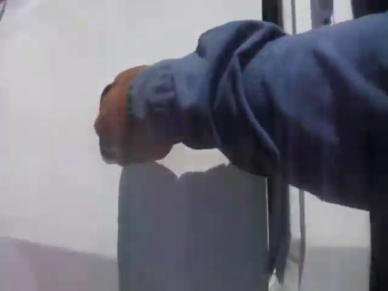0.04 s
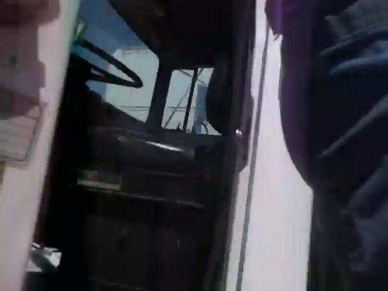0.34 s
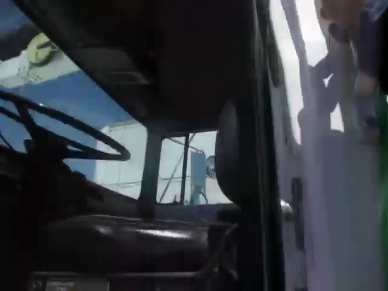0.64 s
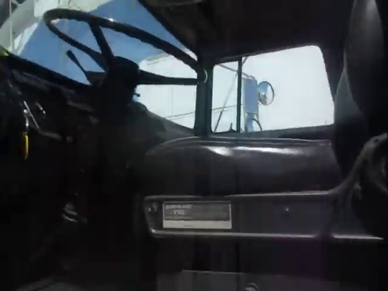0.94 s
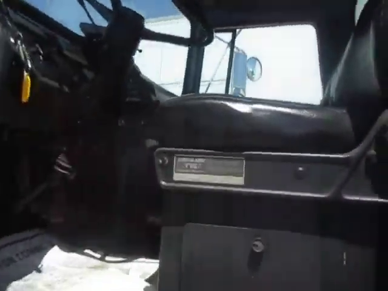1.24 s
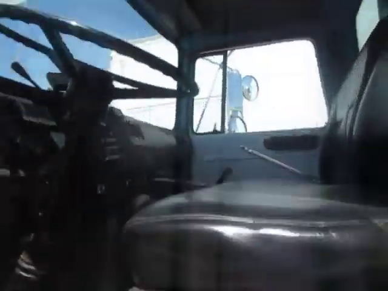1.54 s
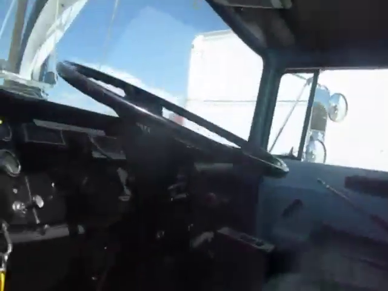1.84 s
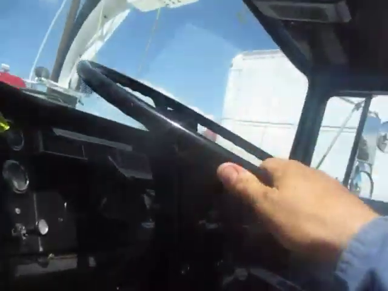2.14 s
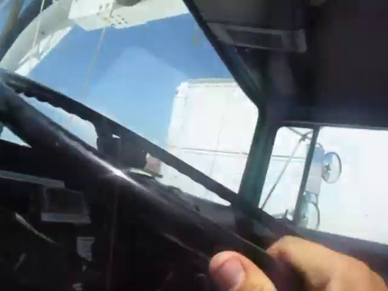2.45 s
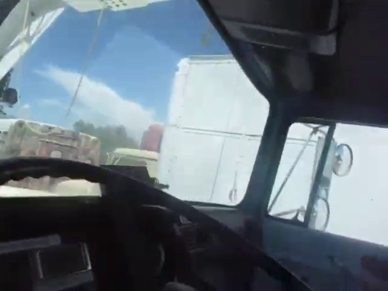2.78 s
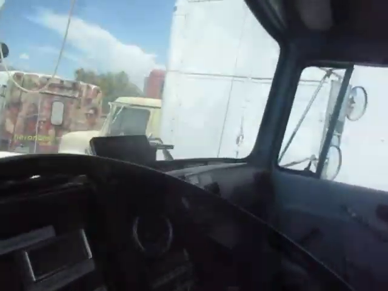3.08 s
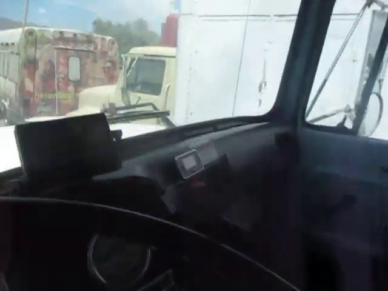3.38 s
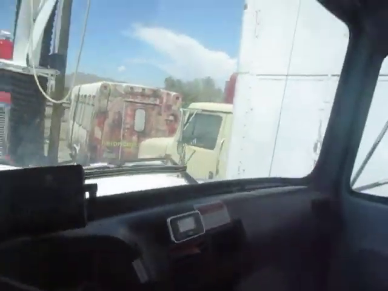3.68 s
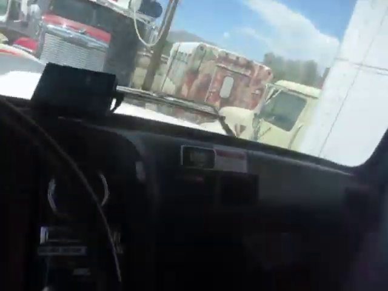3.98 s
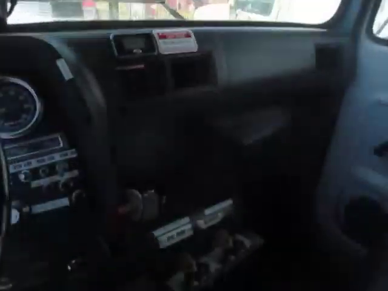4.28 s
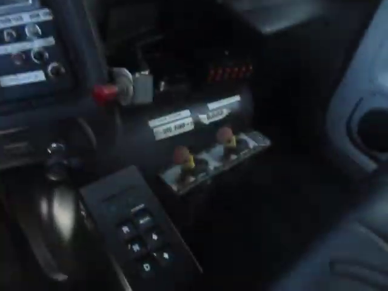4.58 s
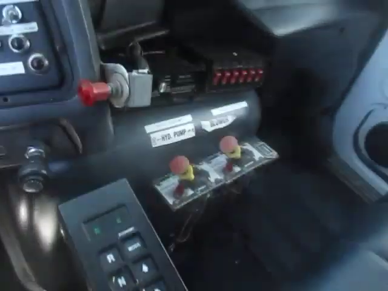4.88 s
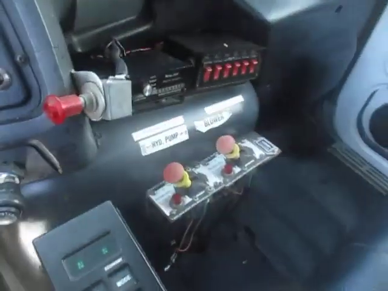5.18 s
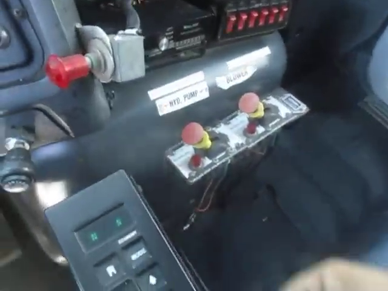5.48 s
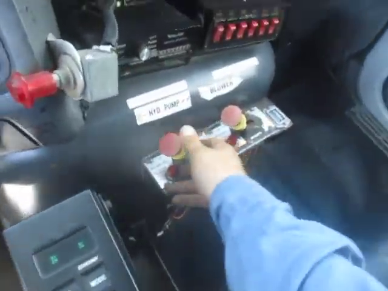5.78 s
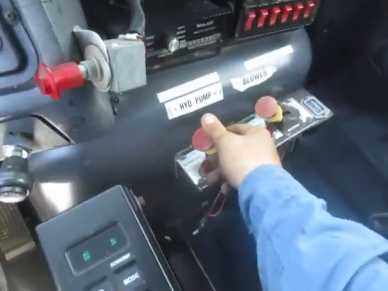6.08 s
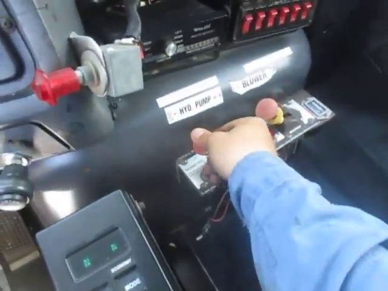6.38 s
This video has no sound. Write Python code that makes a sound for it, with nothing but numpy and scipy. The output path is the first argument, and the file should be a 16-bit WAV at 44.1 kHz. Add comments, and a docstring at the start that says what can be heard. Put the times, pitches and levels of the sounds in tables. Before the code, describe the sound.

A diesel truck idles with a steady, throbbing rumble and clatter. Close by, the door latch snaps open with a metallic rattle, feet thump on the step, and the door and seat squeak sharply in two bouts while clothes scuff. The microphone moves into the cab with the driver, where the clatter softens and the engine becomes a deeper boom. A few dull handling knocks come near the end.

```python
"""At the door of an idling six-cylinder diesel truck, the microphone going in with the driver.
Close by, the latch snaps, hinge and sprung seat squeak by stick and slip, feet thump on the step,
and clothes scuff over the upholstery. Each firing pulses the exhaust and shakes the panels.
Inside, the clatter drops back and the cab booms at the firing rate; handling knocks come near the end."""
import sys
import numpy as np
from scipy import signal
from scipy.io import wavfile
from scipy.ndimage import uniform_filter1d

SR = 44100
rng = np.random.default_rng(int(sys.argv[2]) if len(sys.argv) > 2 else 0)


def int16_out(signal):
    """Quantize to a 16-bit WAV file."""
    q = np.round(np.clip(np.atleast_2d(signal).T, -1, 1) * 32767)
    wavfile.write(sys.argv[1], SR, q.astype(np.int16))


N = 283563
T = np.arange(N) / SR


def engine(firings_per_s=43.15, hunt=0.0031):
    """The diesel, heard from door handle to dashboard; the governor lets the idle wander a little."""
    # Each row: time in seconds, then levels in dB of firing tone, its octave, rumble and clatter.
    way_in = [(0, -30, -25.5, -25, -27.5), (.5, -23, -22.5, -19.5, -24.5), (.9, -20.5, -23, -21.5, -25),
              (1.35, -19.5, -20, -20.5, -23), (2.2, -14, -16.5, -20, -26), (2.55, -16, -22, -22, -27),
              (3.0, -17.5, -22, -19, -28), (3.45, -12.5, -23.5, -19.5, -28.5),
              (4.0, -10.5, -26, -20.5, -27), (4.8, -10.5, -24.5, -21.5, -28),
              (6.43, -11.5, -26.5, -20.5, -28)]
    # Each row: time in seconds, the microphone's shielding by the cab and lean to the dashboard, both 0-1.
    mic_path = [(0, 0.11, 0.3), (2.25, 0.08, 0.3), (2.45, 0.42, 0.02), (3.4, 0.82, 0.07), (4.2, 0.91, 0.04),
                (4.8, 0.99, 1), (6.43, 0.95, 0.87)]
    firings = np.cumsum(firings_per_s * (1 + hunt * drift(2.22))) / SR
    boom_db, octave_db, rumble_db, clatter_db = in_time(way_in)
    inside, lean = np.clip(in_time(mic_path), 0, 1)
    rumble = from_db(rumble_db - 1.6) * panel_rumble(firings, inside, lean)
    clatter = from_db(clatter_db + 1.46) * diesel_clatter(firings, inside)
    pulses = exhaust(firings, boom_db, octave_db, rumble_db)
    return pulses + rumble + clatter + gear_whine(clatter_db, inside)


def exhaust(firings, boom_db, octave_db, rumble_db, waver=0.64):
    """Each firing builds pressure and drops sharply; the higher orders waver as the panels shake."""
    # Each row: multiple of the firing rate, dB added to rumble_db. Unequal cylinders give the half orders.
    orders = [(1.5, -25), (2.5, -18.5), (3, -18), (3.5, -18.5), (4, -14.5), (4.5, -25.5), (5, -27),
              (6, -18), (7, -35), (8, -21), (9, -23), (10, -21.5)]
    angle = 2 * np.pi * firings
    out = from_db(boom_db) * np.sin(angle) * (1 + 0.038 * drift(4.5))
    out += from_db(octave_db) * np.sin(2 * angle) * (1 + 0.17 * drift(8.7))
    for multiple, db in orders:
        tone = np.sin(multiple * angle + waver * drift(0.8))
        out += from_db(rumble_db + db) * tone * (1 + waver * drift(5.1))
    return -np.sqrt(2) * out


def knocks(firings, decay, floor, uneven_db):
    """An envelope that jumps at each firing and fades over its turn; cylinders and cycles differ."""
    # Each cylinder's knock in dB, in firing order.
    cylinders = [-2, 3, -3, 2.5, -1.5, 2]
    turn = firings.astype(int)
    db = np.array(cylinders)[turn % len(cylinders)] + uneven_db * rng.standard_normal(size=400)[turn]
    pulses = from_db(db) * np.exp(-(firings % 1) / decay)
    return rms_one(uniform_filter1d(floor + pulses, size=60))


def panel_rumble(firings, inside, lean):
    """The firings shake the panels into a low rumble, joined inside by the boom of the cab."""
    # In the open, then in the cab. Each row: frequency in Hz, noise density in dB.
    open_colour = [(30, -24), (60, -2), (110, -2), (180, -2.5), (260, -4.5), (400, -7.5), (560, -14.5)]
    cab_colour = [(30, 14), (60, 3.5), (110, -4.5), (180, -5.5), (320, -12.5), (420, -6.5), (560, -11.5)]
    shake = knocks(firings, decay=.4, floor=.7, uneven_db=2.8)
    noise = np.sqrt(1 - inside) * coloured(open_colour)
    noise += np.sqrt(inside) * from_db(-4) * coloured(cab_colour)
    rumble = signal.sosfilt(signal.butter(2, 700, fs=SR, output="sos"), noise * shake)
    return rumble + np.sqrt(inside) * cab_boom(shake, lean)


def cab_boom(shake, lean):
    """The panels drive standing waves in the cab; the microphone moves through their nodes."""
    # Each row: frequency and width in Hz, level in dB over the seat, level in dB by the dashboard.
    air_modes = [(133.4, 15.6, -2, -6), (175.3, 15.6, -11.5, -10), (225.7, 10.3, -16.5, -7),
                 (252.7, 70, -23, -2.5)]
    out = np.zeros(N)
    for hz, width, seat_db, dash_db in air_modes:
        b, a = signal.iirpeak(hz, hz / width, fs=SR)
        drive = shake * rng.standard_normal(N)
        wave = rms_one(signal.lfilter(b, a, signal.lfilter(b, a, drive)))
        out += from_db(seat_db + lean * (dash_db - seat_db)) * wave
    return out


def diesel_clatter(firings, inside, knock_top_hz=2200):
    """The middle range throbs with the firings; the fan's hiss above it stays more even."""
    # In the open, then in the cab. Each row: frequency in Hz, noise density in dB.
    open_colour = [(300, -10), (480, -1.5), (750, 1.5), (1200, 0), (1700, -5.5), (2500, -11), (4000, -23),
                   (6300, -30), (10000, -43), (15500, -55)]
    cab_colour = [(300, 7.5), (480, -2.5), (750, 1), (1200, -1.5), (1700, -6.5), (2500, -11), (4000, -19.5),
                  (6300, -27), (10000, -37), (15500, -50)]
    noise = np.sqrt(1 - inside) * coloured(open_colour) + np.sqrt(inside) * coloured(cab_colour)
    throb = knocks(firings, decay=1.0, floor=6.1, uneven_db=6.0) - 1
    return noise + signal.lfilter(*signal.butter(1, knock_top_hz, fs=SR), noise * throb)


def gear_whine(clatter_db, inside, pitch_hz=886, open_db=-6.5, cab_db=-11):
    """An unsteady gear tone that follows the clatter and swells at a few places on the way in."""
    # Each row: time in seconds, gain in dB, half width in seconds.
    swells = [(.81, 7.5, 0.12), (2.25, 13.5, 0.14), (3.5, 11, 0.3)]
    db = clatter_db + open_db + inside * (cab_db - open_db) + 1.6 * drift(1.4)
    db += sum(gain_db * np.exp(-((T - s) / width) ** 2) for s, gain_db, width in swells)
    hz = pitch_hz * (1 + 0.01054 * drift(31.8))
    return from_db(db) * np.sin(2 * np.pi * np.cumsum(hz) / SR) * (1 + 0.42 * drift(12.5))


def latch():
    """At arm's length the catch snaps free, rings the door shell and sets linkage and panel rattling."""
    # Each row: time of a metal strike in seconds, level in dB.
    strikes = [(0.1744, -15.5), (.179, -11), (.186, -24), (0.217, -17.5)]
    # Each row: frequency in Hz, level in dB, seconds to fall 60 dB.
    shell_modes = [(452.5, 1.5, 0.22), (514, -1, 0.36), (754, -6, 0.29), (1306, 5, 0.14), (1550, -8, .25),
                   (2700, -17, .25), (4170, -11, .09), (5330, -14, 0.2), (7900, -33, .3), (11050, -29, 0.6),
                   (13430, -33, 0.46)]
    # The catch, then the hollow door. Each row: frequency in Hz, noise density in dB.
    crack_colour = [(200, 13.5), (450, 5), (1400, -14), (2500, -3), (4500, -2.5), (8000, -8.5),
                    (12000, -20), (15500, -26)]
    rattle_colour = [(180, -21), (300, -2), (480, 5), (750, -3.5), (1350, -3), (2200, -10.5), (4000, -13.5)]
    cracks = sum(from_db(db - 4) * burst(s, rise=0.00073, t60=0.035) for s, db in strikes)
    release = strikes[1][0]
    buzz = from_db(-29) * burst(release, rise=0.01, t60=1.0)
    rattle = from_db(-21 + 3.9 * drift(53)) * burst(release, rise=0.0023, t60=1.0)
    noise = rattle * coloured(rattle_colour) + (cracks + buzz) * coloured(crack_colour)
    return noise + from_db(-9) * struck(strikes, shell_modes, spread_db=-2.5)


def joint_squeaks(edge_s=.012, catch_db=7.5):
    """Dry door and seat joints sing and briefly catch; every second slip falters, adding a rasp."""
    # One list a squeak. Each row: time in seconds, pitch in Hz, level in dB, bite in dB per octave,
    # relative level of the rasp in dB.
    squeaks = [
        [(.962, 2104, -37, -27, -18), (.981, 2035, -15, -0.5, -26), (.997, 2026, -9.5, -6.5, -21),
         (1.03, 2010, -12.5, -10.5, -17), (1.083, 2020, -19, -8, -20), (1.105, 1995, -23, -0.5, -22),
         (1.15, 2046, -32, -6, -30), (1.19, 2010, -46, -5, -30)],
        [(1.255, 2012, -33, -12, -32), (1.28, 2060, -26, -14, -27), (1.32, 1970, -38, -20, -30)],
        [(2.255, 2090, -35, -22, -45), (2.282, 2080, -29, -16, -45), (2.298, 2042, -11.5, 1, -47),
         (2.335, 2034, -12, 0.5, -57), (2.368, 1958, -13.5, -1.5, -38), (2.39, 1983, -13, 0.5, -10),
         (2.42, 1990, -15.5, 0.5, -16), (2.465, 2015, -11.5, 1, -34), (2.555, 2123, -17, -8, -44),
         (2.575, 2070, -30, 5, -48)],
        [(2.574, 2090, -16.5, 3, -44.5), (2.598, 2122, -15.5, -9.5, -45), (2.68, 2124, -19, -8, -49),
         (2.715, 2140, -36, -20, -40)],
    ]
    # The clean tone, then the rasp half-way between. Each row: multiple of the pitch, level in dB.
    clean_partials = [(1, 1.5), (2, -2), (3, -9.5), (4, -15.5), (5, -16), (6, -23.5), (7, -29)]
    rasp_partials = [(1.5, 0), (2.5, -6.5), (3.5, -8), (4.5, -11), (5.5, -17), (6.5, -27)]
    out = np.zeros(N)
    for rows in squeaks:
        hz, db, bite_db, rasp_db = in_time(rows)
        edges = np.clip(np.minimum(T - rows[0][0], rows[-1][0] - T) / edge_s, 0, 1)
        gain = from_db(db - catch_db * np.maximum(drift(28) - .5, 0)) * edges
        clean = stick_slip(hz, gain, clean_partials, jitter=.0045, flutter_db=2.6, bite_db=bite_db)
        rasp = stick_slip(hz, gain, rasp_partials, jitter=.012, flutter_db=2.0) * (.7 + .8 * drift(110))
        out += clean + from_db(rasp_db) * rasp
    return out


def hinge_chirps():
    """The hinge sings thin gliding notes that swell, hold and die."""
    # Each row: start, attack, hold and 60 dB fall in seconds, pitch in Hz, glide in Hz/s, level in dB.
    chirps = [(0.736, 0.056, 0.059, .035, 5430, 4200, -26.5), (1.829, 0.0033, 0.01, 0.1, 10090, -300, -23)]
    # Each row: multiple of the pitch, level in dB.
    partials = [(1, -2.5), (2, -32)]
    out = np.zeros(N)
    for start, attack, hold, t60, hz, glide, db in chirps:
        age = np.maximum(T - start, 0)
        fall_db = 60 * np.clip((age - attack - hold) / t60, 0, 2)
        gain = from_db(db - fall_db) * np.minimum(age / attack, 1)
        out += stick_slip(hz + glide * age, gain, partials, jitter=0.0074, flutter_db=-0.5)
    return out


def stick_slip(hz, gain, partials, jitter, flutter_db, bite_db=0):
    """Stick-slip locks onto a resonance of the joint; the grip wavers, and each partial with it."""
    angle = 2 * np.pi * np.cumsum(hz * (1 + jitter * drift(142.0))) / SR
    on, out = gain > 1e-4, np.zeros(N)
    bite_db = np.broadcast_to(bite_db, N)[on]
    for multiple, partial_db in partials:
        if np.all(multiple * hz[on] < SR / 2):
            db = partial_db + bite_db * np.log2(multiple) + flutter_db * np.minimum(drift(47)[on], 1)
            out[on] += from_db(db) * np.sin(multiple * angle[on])
    return np.sqrt(2) * gain * out


def thumps():
    """Low, short thumps of climbing in, then handling knocks on the microphone."""
    # Each row: time in seconds, level in dB.
    hits = [(.495, -22), (.531, -25), (.543, -12.5), (.686, -15.5), (2.04, -24), (3.972, -18.5),
            (4.405, -16), (5.15, -17), (5.70, -18), (5.79, -26), (5.815, -18), (5.89, -15)]
    # Each row: frequency in Hz, level in dB, seconds to fall 60 dB.
    low_modes = [(90, 3, .08), (138.4, 3, 0.16), (220, -1, 0.068), (320, -13, 0.028), (458, 0.5, 0.044)]
    return struck(hits, low_modes, spread_db=1.5)


def scuffs(grain_db=2.5, t60=0.14):
    """Cloth scuffs on the seat close by, plus two bursts of friction noise from the squeaking joints."""
    # Each row: time of the peak in seconds, level in dB, rise in seconds, tilt in dB per octave.
    strokes = [(0.854, -22, 0.003, -2), (0.977, -20, .006, -3), (1.221, -22, 0.0022, -4),
               (1.385, -29.5, 0.0053, -4), (1.473, -28, .004, -6), (2.09, -33, 0.015, 0),
               (2.39, -21, 0.0065, 11), (3.135, -22, 0.025, 1.5), (3.153, -18.5, 0.009, 0),
               (3.272, -32, .002, 2), (3.391, -23.5, 0.0046, 3), (3.525, -25, 0.0018, 5),
               (3.569, -24, 0.0034, 2.5), (3.623, -32.5, .002, -1), (3.668, -23, .002, 1.5),
               (3.784, -30.5, 0.024, 1.5), (3.83, -28.5, .012, 0.5), (3.89, -21.5, 0.025, 1.5),
               (4.144, -28.5, .0022, .5), (4.305, -30, .0021, 3.5), (5.025, -33.5, .002, 4),
               (5.11, -32, 0.019, 0.5), (5.353, -23.5, 0.0074, -0.5), (5.594, -34.5, .0066, 0),
               (5.67, -34.5, .008, 3), (5.77, -37, .03, 3), (5.90, -43.5, .006, 11.5)]
    # Each row: frequency in Hz, noise density in dB.
    friction_colour = [(600, -2.5), (1400, 2), (2600, 4), (4000, -0.5), (6300, -7), (9000, -15),
                       (12500, -25), (15500, -38)]
    hz, noise = bands(friction_colour)
    octaves, out = np.log2(hz / 4000), np.zeros(N)
    for s, db, rise, tilt_db in strokes:
        near = slice(int(max(s - .2, 0) * SR), int((s + .4) * SR))
        tilted = from_db(tilt_db * octaves) @ noise[:, near]
        out[near] += from_db(db) * burst(s, rise, t60)[near] * tilted
    crackle = rms_one(from_db(grain_db * np.minimum(drift(500), 2)))
    return out * crackle


def cab(x, wet_db, t60=0.25):
    """Direct sound plus dense, short reflections from nearby glass and panels."""
    t = T[:SR // 3]
    tail = rng.standard_normal(len(t)) * np.exp(-np.log(1000) * t / t60) * (t > .002)
    return x + from_db(wet_db) * signal.fftconvolve(x, tail / np.linalg.norm(tail))[:N]


def gain_control(x, ceiling_db=-13, recovery_db_per_s=4, sense_hz=890):
    """Loud, shrill sounds turn the gain down at once; it creeps back afterwards."""
    treble = signal.sosfilt(signal.butter(2, sense_hz, "high", fs=SR, output="sos"), x[0])
    level_db = 10 * np.log10(np.abs(uniform_filter1d(treble ** 2, size=900)) + 1e-12)
    recovery = recovery_db_per_s * T
    cut_db = np.maximum.accumulate(np.maximum(level_db - ceiling_db, 0) + recovery) - recovery
    return x * from_db(-cut_db)


def struck(hits, modes, spread_db):
    """Every hit rings every mode, with a strength of its own."""
    s, db = np.transpose(hits)
    out, chance = np.zeros(N), rng.standard_normal((len(hits), len(modes)))
    for k, (hz, mode_db, t60) in enumerate(modes):
        clicks = np.full(N, 1e-18)
        clicks[(s * SR).astype(int)] = from_db(db + mode_db + spread_db * chance[:, k]) * (-1) ** k
        r, w = from_db(-60 / (t60 * SR)), 2 * np.pi * hz / SR
        out += signal.lfilter([0, np.sin(w)], [1, -2 * r * np.cos(w), r * r], clicks)
    return out


def burst(s, rise, t60):
    """An envelope that swells to 1 at time s and then dies away."""
    return np.exp(np.maximum(np.where(T < s, (T - s) / rise, (s - T) * np.log(1000) / t60), -30))


def bands(spectrum):
    """Centres in Hz and third-octave noise bands that follow a spectrum, with total power 1."""
    hz, db = np.transpose(spectrum)
    edges = 25 * 2 ** (np.arange(29) / 3)
    white, centres, out = rng.standard_normal((2, N)), [], []
    for k, (low, high) in enumerate(zip(edges, edges[1:])):
        if high > hz[0] and low < hz[-1]:
            centres.append(np.sqrt(low * high))
            band = signal.sosfilt(signal.butter(3, [low, high], "band", fs=SR, output="sos"), white[k % 2])
            out.append(band * from_db(np.interp(np.log(centres[-1]), np.log(hz), db)))
    return np.array(centres), np.array(out) / np.std(np.sum(out, axis=0))


def coloured(spectrum):
    """Noise of power 1 with the given spectrum."""
    return bands(spectrum)[1].sum(axis=0)


def drift(hz):
    """A random wander of spread 1, mostly slower than hz."""
    r = np.exp(-80 * np.pi * hz / SR)
    slow = signal.lfilter([1], [1, -2 * r, r * r], rng.standard_normal(N // 40 + 2002))[2000:]
    return np.interp(np.arange(N) / 40, np.arange(len(slow)), rms_one(slow))


def in_time(rows):
    """Each column of a timed curve at every sample."""
    s, *columns = np.transpose(rows)
    return [np.interp(T, s, c) for c in columns]


def from_db(db):
    """Decibels to gain."""
    return 10 ** (np.asarray(db) / 20)


def rms_one(x):
    """Scale to unit power."""
    return x / np.sqrt(np.mean(x ** 2) + 1e-20)


def scene():
    """The idling engine under the close sounds of climbing in, on one microphone."""
    joints = cab(joint_squeaks(), wet_db=-16)
    hinge = cab(hinge_chirps(), wet_db=-3.5)
    return (thumps() + engine() + latch() + joints + hinge + cab(scuffs(), wet_db=-11))[None]


def record(dry, low_hz=30.6, top_hz=15750):
    """The microphone loses the deepest bass; shrill peaks duck the gain, are rounded, and the top is cut."""
    heard = gain_control(signal.sosfilt(signal.butter(4, low_hz, "high", fs=SR, output="sos"), dry))
    rounded = heard / (1 + (heard / .9) ** 8) ** (1 / 8)
    return signal.sosfilt(signal.ellip(10, .1, 90, top_hz, fs=SR, output="sos"), rounded)


dry = scene()
out = record(dry)
int16_out(out)
```